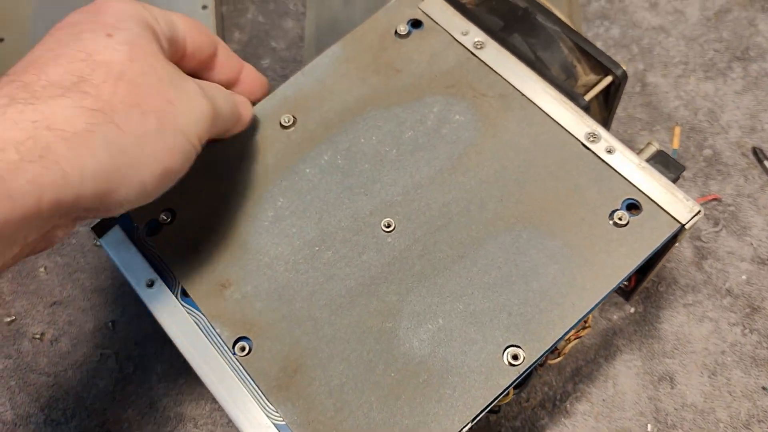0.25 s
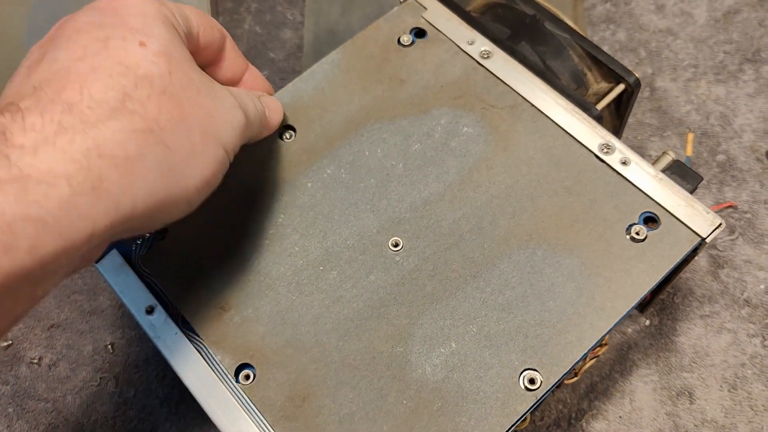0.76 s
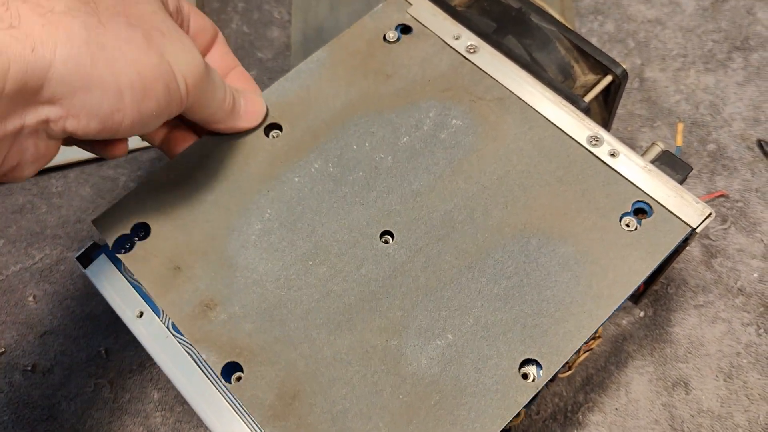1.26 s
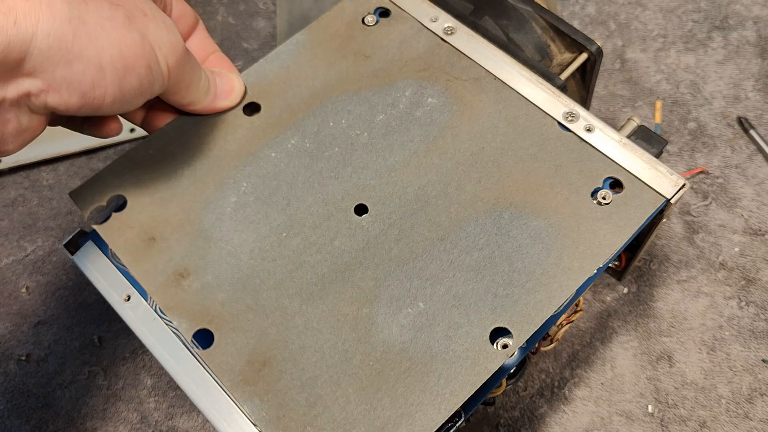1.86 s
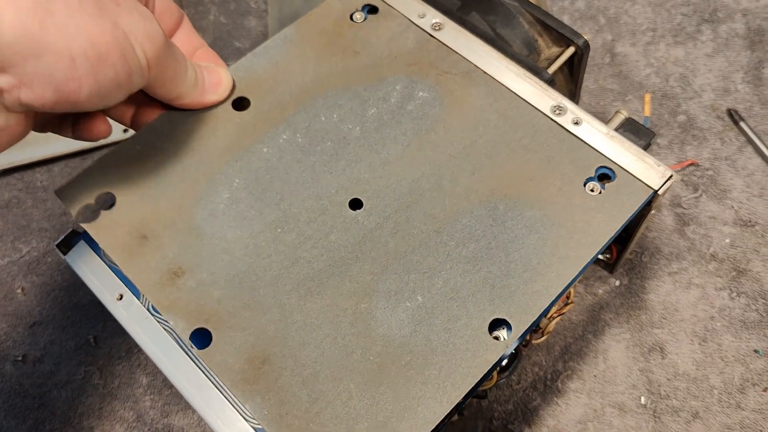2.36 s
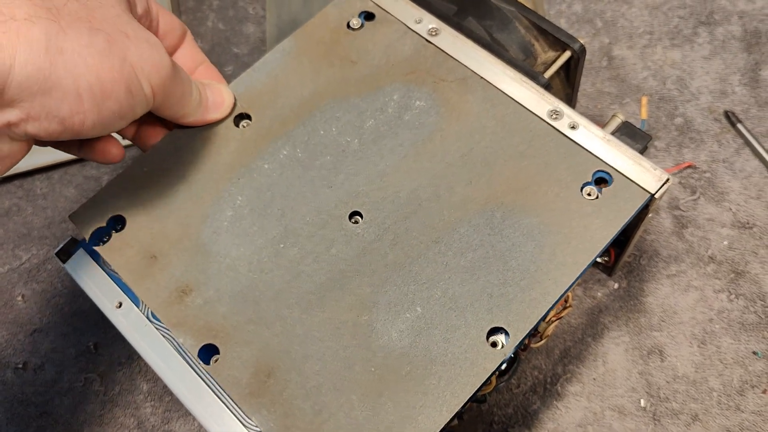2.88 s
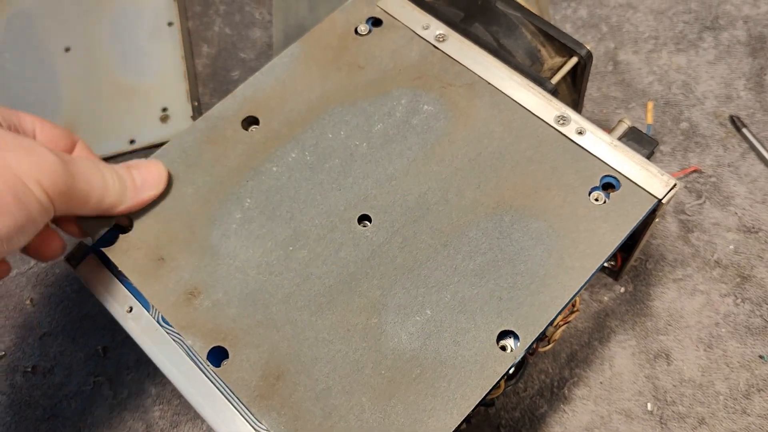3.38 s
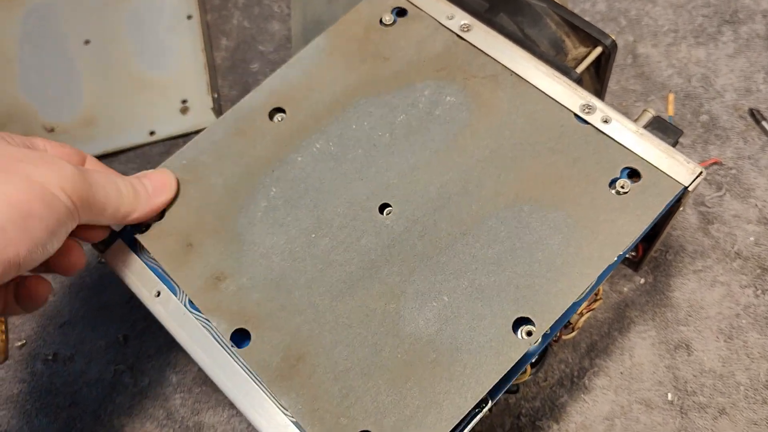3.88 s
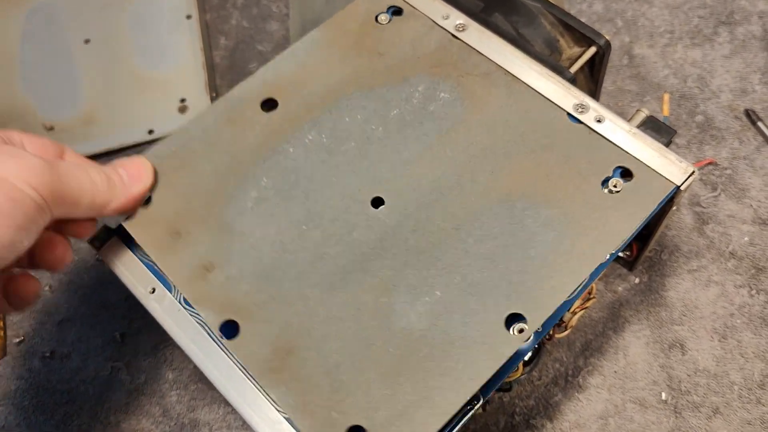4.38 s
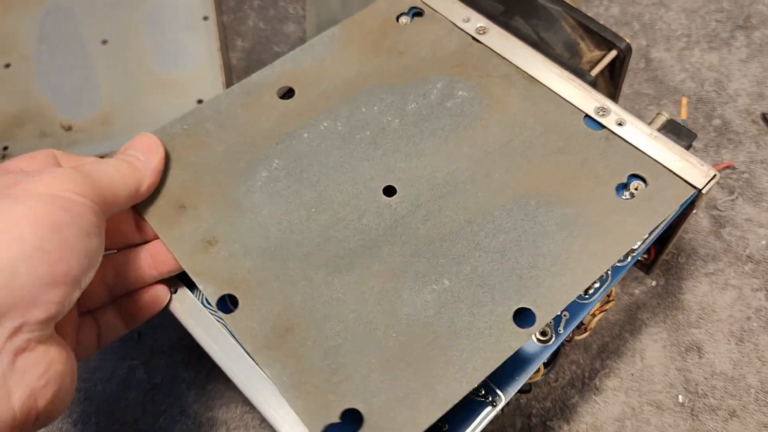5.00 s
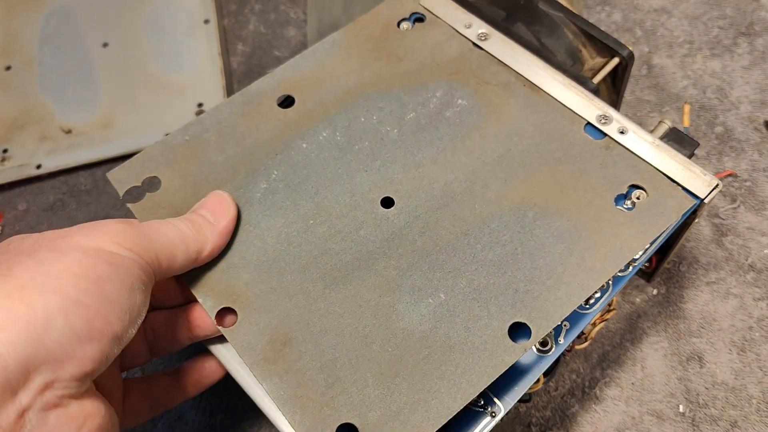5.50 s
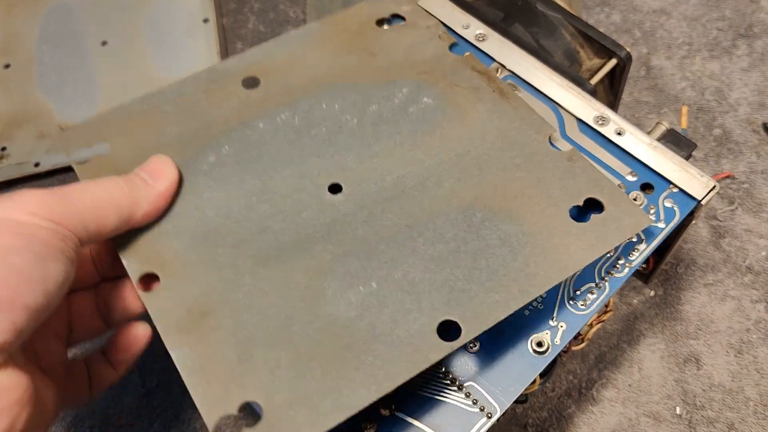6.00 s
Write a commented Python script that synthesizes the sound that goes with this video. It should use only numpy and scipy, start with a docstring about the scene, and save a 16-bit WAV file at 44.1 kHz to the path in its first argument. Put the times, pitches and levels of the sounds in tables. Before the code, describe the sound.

Heard close up in a quiet room, a thin steel panel flexes with a faint low wobble, and another plate slides aside with a short juddering scrape. Sharp clicks and light clanks follow at uneven intervals as the panel catches on the screws and frame of a chassis. Fingers stick and slip on the metal and small parts ping softly. Toward the end the panel scrapes and clatters more loudly, then ticks lightly.

```python
"""First comes a low, wobbling hum: a thin steel cover flexes as a hand works it loose from a chassis.
A second plate whispers over the carpeted bench, then groans briefly as it is shoved aside.
Fingers stick and slip on the cover, it clicks and rattles on screw heads, and small parts ping.
A quiet room lies under it all, and everything is heard close up, in stereo."""
import sys
import numpy as np
from scipy import signal
from scipy.fft import rfft, irfft
from scipy.io import wavfile
from scipy.ndimage import uniform_filter1d

SR = 44100
rng = np.random.default_rng(int(sys.argv[2]) if len(sys.argv) > 2 else 0)


def materialize(psi):
    """Save the field psi as 16-bit PCM at rate SR to the path in sys.argv[1].

    A 1-D psi becomes a single channel; in a 2-D psi each row is a channel.
    """
    bounded = np.clip(np.atleast_2d(psi).T, -1, 1)
    quanta = np.round(bounded * 32767).astype(np.int16)
    wavfile.write(sys.argv[1], SR, quanta)


N = 275625  # 6.25 seconds


def gain_of(db):
    return 10 ** (np.asarray(db) / 20)


def unit_level(x):
    return x / np.sqrt(np.mean(x ** 2) + 1e-20)


def curve_at(points, hz):
    freqs, values = np.transpose(points)
    return np.interp(np.log(hz + 1), np.log(freqs + 1), values)


def add_at(mix, start_s, sound):
    part = mix[:, round(start_s * SR):][:, :sound.shape[1]]
    part += sound[:, :part.shape[1]]


def filtered(x, gain):
    """Turns each frequency up or down by gain(hz)."""
    return irfft(rfft(x) * gain(np.fft.rfftfreq(x.shape[-1], 1 / SR)), x.shape[-1])


def above(edge_hz, hz, steepness):
    """Near 0 below the edge and near 1 above it."""
    return 1 / (1 + (edge_hz / (hz + 1)) ** steepness)


def wander(shape, smooth):
    """A random wiggle, smoothed over that many points."""
    return unit_level(uniform_filter1d(rng.standard_normal(shape), smooth))


def peaks(modes, hz):
    """Gain with a peak at each mode, a note that the steel likes to ring at."""
    return np.sqrt(sum(gain_of(2 * db) / (1 + (2 * (hz - f) / width) ** 2) ** 2
                       for f, width, db in modes))


def swells(full_s, rise, hold, fall, db, tiring_db_per_s=9.5):
    """Loudness of moves that climb 20 dB during rise, weaken during hold and drop 20 dB during fall."""
    t = np.arange(0, N, 32)[:, None] / SR
    rise, hold, fall = (np.maximum(x, .001) for x in (rise, hold, fall))
    fade_db = 20 * np.maximum(np.maximum((full_s - t) / rise, (t - full_s - hold) / fall), 0)
    tired_db = tiring_db_per_s * np.clip(t - full_s, 0, hold)
    return np.interp(np.arange(N) / SR, t[:, 0], gain_of(db - fade_db - tired_db).sum(1))


# Each row: frequency in Hz, how alike left and right are (1 means the same).
LIKENESS = [(60, 0.99), (500, 0.85), (1500, 0.3), (15000, 0.75)]
def stereo_noise(size):
    """Left and right noise, partly alike, as from a nearby source."""
    left, other = rng.standard_normal((2, size))
    same = lambda hz: np.clip(curve_at(LIKENESS, hz), 0, 1)
    right = filtered(left, same) + filtered(other, lambda hz: np.sqrt(1 - same(hz) ** 2))
    return np.array([left, right])


# Jolts of the hand. Each row: time of full strength and hold in seconds, hum and wobble in dB.
JOLTS = [(0., .01, -53, -46.5), (0.115, 0.16, -79, -59.5), (0.775, .01, -71, -83), (0.917, 0.013, -68, -78),
         (1.076, 0.11, -55, -53), (1.478, 0.093, -65, -78), (1.73, .1, -76, -71),
         (1.951, 0.021, -54, -68.5), (2.097, 0.19, -79, -68), (2.327, 0.045, -53.5, -81),
         (2.596, 0.23, -74, -82), (2.945, 0.13, -66.5, -60.5), (3.103, 0.1, -62, -62),
         (3.373, 0.036, -65, -77), (3.62, .06, -59, -80), (3.753, 0.091, -63, -55),
         (4.022, 0.042, -60, -59), (4.15, 0.04, -61.5, -58), (4.347, 0.053, -51.5, -78.5),
         (4.583, 0.028, -53, -57.5), (4.747, 0.065, -70, -67.5), (5.055, 0.12, -73, -69.5),
         (5.303, .03, -66, -73.5), (5.462, 0.034, -57.5, -58.5), (5.627, 0.047, -54.5, -60),
         (5.786, .04, -47, -50), (5.86, .01, -62.5, -55.5), (6.047, 0.023, -56, -74),
         (6.19, 0.013, -50, -67)]
def cover_flexing():
    """Each jolt shakes the two lowest modes of the loose cover: a hum and a deeper wobble."""
    full_s, hold, hum_db, wobble_db = np.transpose(JOLTS)
    shake, t = stereo_noise(N), np.arange(N) / SR

    def mode(pitch_hz, width_hz):
        rumble = filtered(shake, lambda hz: (hz > 28) / (1 + ((hz - pitch_hz) / width_hz) ** 2))
        note = np.sin(2 * np.pi * (pitch_hz * t + rng.random()))
        return unit_level(unit_level(rumble) + 0.96 * note)

    hum = mode(114, 16.5) * swells(full_s, rise=0.07, hold=hold, fall=0.09, db=hum_db)
    wobble = mode(31, 24) * swells(full_s, rise=0.07, hold=hold, fall=0.091, db=wobble_db)
    return hum + wobble


# Tone of steel on carpet. Each row: frequency in Hz, level in dB.
CARPET_TONE = [(590, -13), (1000, -7), (1110, -29), (1400, -44), (1550, -20), (2140, 0.5), (2480, -6),
               (3420, -6), (3710, 0.5), (4060, -7), (6820, -15), (10700, -28.5), (15600, -28)]
# Slides of the plate. Each row: time of full strength, rise, hold and fall in seconds, level in dB.
PLATE_SLIDES = [(0., .01, .003, 0.23, -61), (0.431, 0.0031, 0.029, 0.044, -69.5),
                (0.54, 0.09, 0.032, 0.062, -69.5), (0.64, 0.056, .004, .08, -57),
                (0.754, 0.085, .004, .005, -58.5)]
def plate_whisper():
    """The second plate drags over the carpet with a soft hiss, a little to the left."""
    hiss = unit_level(filtered(stereo_noise(N), lambda hz: gain_of(curve_at(CARPET_TONE, hz))))
    return hiss * swells(*np.transpose(PLATE_SLIDES)) * gain_of([[2.1], [-2.1]])


# The cover's modes, rung by rubs and by hits. Each row: pitch in Hz, width in Hz, level in dB.
LOW_MODES = [(162, 24, -11), (183.5, 12, -10), (241.2, 18, 2), (289, 39, -1), (331.2, 12.2, -4),
             (405, 32, -0.5)]
MIDDLE_MODES = [(504.7, 47, 0.5), (567, 40, -4.5), (652, 29.5, -4), (761, 44, -5), (901.6, 36, -7),
                (1027, 37, -7.5), (1168, 29, -7), (1160, 30, -8), (1244, 45, 2), (1437, 40, 2.5),
                (1534, 210, -0.5)]
UPPER_MODES = [(2060, 22, 13), (2372, 69, 6), (2754, 38, 7), (3104, 140, 5), (3500, 310, -13.5),
               (3450, 22, -40), (3956, 200, -6), (4114, 13, 13.5), (4170, 40, 0.5), (5030, 70, -33),
               (5240, 22, -11), (6600, 78, 5.5), (6890, 31, 13)]
# Tone of a rub's hiss, body and high sheen. Each row: frequency in Hz, level in dB.
HISS_TONE = [(710, -50.5), (1200, -23), (1270, -13), (1800, -9.5), (2160, -3), (2550, -4.5), (2830, 1),
             (4040, 4.5), (4780, -3.5), (6510, -1.5), (8000, -10), (10400, -60.5), (17600, -120)]
BODY_TONE = [(100, -42.5), (170, 1.5), (231, -2), (446, -5), (515, 3), (817, -5.5), (883, -1.5), (1250, -9),
             (1700, -10.5), (2210, -25), (3740, -120)]
SHEEN_TONE = [(4120, -30), (7000, 0), (7770, -6), (8250, -5), (9720, -1), (12900, -13), (15600, -10)]
# Each row: time of full strength, rise, hold and fall in seconds, then hiss, body and sheen in dB.
RUBS = [(0., 0.011, 0.0038, .3, -79, -60, -95), (1.08, 0.011, .002, 0.042, -55, -48.5, -75),
        (1.122, .02, 0.047, 0.044, -65, -66, -76.5), (1.237, 0.011, .045, 0.015, -63, -71, -72.5),
        (1.398, 0.08, .003, .01, -70, -82, -82), (1.464, 0.062, .004, .035, -62, -69, -73.5),
        (1.824, .04, .002, 0.017, -74, -70, -90), (1.863, 0.0084, .002, 0.0087, -81, -69, -90),
        (1.931, 0.042, 0.013, 0.015, -47.5, -51, -60), (1.955, .01, 0.043, 0.024, -74, -67, -86),
        (2.172, 0.059, .002, 0.017, -71.5, -68.5, -90), (2.256, 0.041, .004, 0.035, -55.5, -58, -71),
        (2.314, 0.022, .002, 0.0079, -49.5, -51, -62), (2.341, 0.034, 0.0034, 0.089, -59, -58, -82),
        (2.549, 0.021, .003, .09, -67, -65.5, -80), (2.83, 0.068, 0.0037, 0.012, -64, -68.5, -76.5),
        (2.962, 0.07, 0.0033, .01, -60, -60, -76), (3.031, 0.032, .002, .03, -58, -59, -73),
        (3.115, 0.0051, .002, 0.03, -73, -56, -78), (3.147, 0.027, 0.48, .018, -50, -63, -59.5),
        (3.673, .01, .002, 0.037, -61, -54.5, -79), (3.741, 0.025, 0.0027, 0.029, -58, -60, -65),
        (3.796, 0.03, 0.0046, 0.048, -60.5, -58, -75), (3.98, 0.059, 0.02, 0.012, -62, -66, -75),
        (4.128, 0.043, .004, 0.012, -49.5, -53, -61), (4.156, 0.015, 0.024, 0.016, -56.5, -54.5, -77),
        (4.285, 0.058, 0.013, 0.011, -58, -59.5, -72), (4.355, 0.024, 0.016, 0.14, -60.5, -56, -77),
        (4.56, 0.028, 0.0018, 0.0087, -48, -52, -66), (4.59, .01, 0.017, 0.069, -55.5, -53, -73),
        (4.709, 0.035, 0.046, 0.056, -52, -60, -64.5), (4.835, 0.037, 0.024, 0.016, -73, -72, -88.5),
        (5.104, .08, 0.022, 0.1, -55.5, -57.5, -65), (5.19, 0.011, 0.0026, 0.03, -92, -55, -100),
        (5.34, 0.099, 0.047, 0.079, -54, -68.5, -55), (5.429, 0.034, .005, 0.081, -53, -61.5, -65.5),
        (5.503, 0.025, .004, 0.045, -70, -66, -78), (5.536, 0.036, 0.0044, 0.16, -66, -56.5, -75.5),
        (5.682, 0.025, 0.034, .02, -75, -64, -86), (5.744, 0.01, 0.034, 0.0087, -41.5, -46, -53.5),
        (5.787, 0.022, 0.0031, 0.021, -29.5, -35, -46), (5.839, .01, 0.0015, 0.01, -51, -40.5, -74),
        (5.852, .01, .003, 0.14, -64, -60, -78), (6.04, 0.017, .002, 0.04, -58.5, -49, -66.5),
        (6.093, 0.029, .04, 0.009, -75, -76, -82), (6.15, 0.012, .002, 0.048, -50, -51, -62.5),
        (6.24, 0.014, .01, .01, -69, -69, -79)]
def cover_rubbing():
    """Fingers and edges stick and slip on the cover, and the tiny grains of noise ring the steel."""
    roughness = gain_of(1.63 * wander(N, smooth=60))
    grains = stereo_noise(N) * roughness
    top = lambda hz: above(7300, hz, steepness=12)
    band = lambda tone, shape: filtered(grains, lambda hz: gain_of(curve_at(tone, hz)) * shape(hz))
    hiss = band(HISS_TONE, lambda hz: (1 - top(hz)) * (1 + 0.37 * peaks(UPPER_MODES, hz)))
    body = band(BODY_TONE, lambda hz: 1 + 2.5 * peaks(LOW_MODES + MIDDLE_MODES, hz))
    sheen = band(SHEEN_TONE, top)
    *timing, hiss_db, body_db, sheen_db = np.transpose(RUBS)
    layers = (hiss, hiss_db), (body, body_db), (sheen, sheen_db)
    return sum(unit_level(sound) * swells(*timing, db) for sound, db in layers)


# Tone of the quiet room. Each row: frequency in Hz, level in dB.
AIR_TONE = [(20, -51), (31, 4.5), (107, -4), (188, -6.5), (390, 2), (446, -6), (948, -17), (1460, -21),
            (1620, -22.5), (3270, -23.5), (3950, -22.5), (4770, -35), (6770, -25), (7960, -36),
            (15600, -28.5)]
def room_air(level_db=-69.5):
    """The room's faint, steady background noise."""
    noise = filtered(stereo_noise(N), lambda hz: gain_of(curve_at(AIR_TONE, hz)))
    return gain_of(level_db) * unit_level(noise)


# Each row: frequency in Hz, seconds for the echo to fade by 60 dB.
ECHO_FADES = [(200, 0.25), (1000, 0.29), (4000, 0.12), (12000, 0.21)]
def room_echo(sound):
    """Many small reflections blur together, each frequency dying at its own speed."""
    echoes = np.zeros((2, SR // 2))
    delays = np.arange(300, SR // 2 - 20, 20) + rng.integers(0, 20, (2, (SR // 2 - 301) // 20))
    np.put_along_axis(echoes, delays, rng.choice([-1., 1.], delays.shape), 1)
    hz, t, spectrum = signal.stft(echoes, SR, nperseg=256)
    fade = gain_of(-60 * t / curve_at(ECHO_FADES, hz)[:, None])
    tail = signal.istft(spectrum * fade, SR, nperseg=256)[1]
    return signal.fftconvolve(sound, tail / np.linalg.norm(tail[0]), axes=1)[:, :N]


# The second plate's modes. Each row: pitch in Hz, width in Hz, level in dB.
PLATE_MODES = [(340.2, 20, 1.5), (404.4, 27, -0.5), (492, 62, -1), (572, 25, -7), (660, 46, -0.5),
               (792, 52, -4), (890, 40, -28.5), (1255, 40, -22)]
# Tone of the plate's grit and the cover's clicks. Each row: frequency in Hz, level in dB.
STEEL_TONE = [(880, -7), (1500, -4), (1800, -4.5), (2090, -2.5), (2530, -3.5), (2690, 1), (4410, 0),
              (5130, -9), (6670, -6), (7690, -15.5), (9120, -11), (13400, -27.5), (15300, -18),
              (16700, -23)]
# Jerks of the plate. Each row: time of full strength, rise, hold and fall in seconds,
# groan in dB, favoured pitch in Hz, grit in dB.
PLATE_JERKS = [(0.654, 0.052, .003, 0.017, -56, 567, -59), (0.69, 0.057, .003, 0.076, -61.5, 413, -64),
               (0.771, 0.0064, 0.0056, 0.031, -33.5, 405, -38), (0.815, .005, 0.0059, .04, -48.5, 495, -55),
               (0.844, .005, 0.011, 0.023, -47, 355, -51), (0.86, .008, 0.0067, 0.02, -44, 520, -51.5),
               (0.881, 0.018, 0.0069, 0.027, -37.5, 455, -43),
               (0.912, 0.0037, 0.017, 0.023, -40.5, 329, -50)]
def plate_groan():
    """The shoved plate judders with a gritty scrape, and each jerk favours different modes."""
    *timing, groan_db, favoured_hz, grit_db = np.transpose(PLATE_JERKS)
    mode_hz, _, mode_db = np.transpose(PLATE_MODES)[:, :, None]
    closeness = lambda ratio: gain_of(-90 * np.log2(ratio) ** 2)
    ratios = mode_hz / favoured_hz
    weights = gain_of(mode_db) * (closeness(ratios) + 0.5 * closeness(ratios / 1.8))
    shares_db = 20 * np.log10(weights / np.linalg.norm(weights, axis=0))
    shake, t = stereo_noise(N), np.arange(N) / SR
    groan = np.zeros((2, N))
    for share_db, mode in zip(shares_db, PLATE_MODES):
        note = np.sin(2 * np.pi * (mode[0] * t + rng.random()))
        rasp = unit_level(filtered(shake, lambda hz: peaks([mode], hz)))
        groan += swells(*timing, groan_db + share_db) * unit_level(note + 0.64 * rasp)
    judder = gain_of(3.3 * wander(N, smooth=150))
    scrape = filtered(shake, lambda hz: gain_of(curve_at(STEEL_TONE, hz) - 8 * above(7000, hz, 6)))
    grit = unit_level(scrape * judder) * swells(*timing, grit_db)
    return groan * gain_of([[-1.1], [1.1]]) + grit * gain_of([[2.1], [-2.1]])


HIT_SAMPLES, CLICK_LEAD_S = 8192, .012  # the lead gives a click time to rise before its peak
def click(treble_db, bright_hz, rise_s, rattle_s):
    """A sharp tick, then tiny uneven bounces, ringing the cover's upper modes."""
    t = np.arange(HIT_SAMPLES) / SR - CLICK_LEAD_S
    bounces = gain_of(3.5 * wander(HIT_SAMPLES, smooth=60) * np.clip(t / .004, 0, 1))
    attack = np.exp(np.minimum(t, 0) / max(rise_s, .0002))
    fade = lambda seconds: gain_of(-60 * abs(t) / seconds)
    decay = fade(max(rattle_s, .005)) + 0.4 * fade(0.0035) + 0.014 * fade(0.23)  # rattle, tick, tail
    luck_db = 2.5 * wander(HIT_SAMPLES // 2 + 1, smooth=40)  # pitches that this hit favours

    def tone(hz):
        bright_db = 8 * np.exp(-(np.log((hz + 1) / bright_hz) / 0.21) ** 2)
        top_db = (treble_db + 13.5) * above(7000, hz, 6)
        db = curve_at(STEEL_TONE, hz) + luck_db + bright_db + top_db
        return gain_of(db) * above(1100, hz, 4) * (1 + 0.63 * peaks(UPPER_MODES, hz))

    sound = filtered(stereo_noise(HIT_SAMPLES), tone) * attack * decay * bounces
    return sound / np.sqrt(uniform_filter1d(sound ** 2, 88, axis=1).max())  # loudest 2 ms at level 1


def cover_ring(modes, centre_hz):
    """Struck modes die away; the spot that is hit favours those near one pitch, with some luck."""
    hz, width, db = np.transpose(modes)[:, :, None]
    t = np.arange(HIT_SAMPLES) / SR
    luck, phase = rng.standard_normal((2, len(modes), 1))
    db = db + 2 * luck - 4.6 * np.log2(hz / centre_hz) ** 2
    ring = (gain_of(db) * np.exp(-np.pi * width * t) * np.sin(2 * np.pi * hz * t + phase)).sum(0)
    ring *= 1 - np.exp(-t / 0.0014)  # the bass takes a moment to build
    return ring / abs(ring).max() * np.ones((2, 1))


# Each row: time in seconds, click level in dB, thud and clank in dB above the click, clank pitch in Hz,
# treble in dB (-13.5 is neutral), bright spot in Hz, rise in seconds, seconds for the rattle to fade
# by 60 dB, and how many dB louder the click is on the left.
COVER_HITS = [(0.811, -42.5, -16, 7, 510, -46, 2530, 0.0018, 0.081, -3.5),
              (1.0163, -24.5, -19, -10.5, 496, -15, 3300, 0.00058, 0.018, -0.5),
              (1.033, -34.5, -27, -5, 495, -28, 3140, 0.0013, 0.051, 0),
              (1.0852, -41, -6, -17, 522, -12, 3440, 0.001, 0.033, 0),
              (1.1113, -35, -30, -12.5, 554, -21, 4000, 0.0012, 0.03, 1.5),
              (1.4109, -45, -22, -4.5, 695, -36, 2110, 0.0013, 0.028, 8.5),
              (1.51, -64.5, -13, 7.5, 680, -36, 3870, 0.0012, 0.025, 4),
              (1.9251, -51.5, -16, 16.5, 505, -15, 4430, 0.001, 0.035, -4),
              (1.9395, -37.5, -23, -3, 474, -2, 3330, 0.00052, 0.014, 6),
              (2.0208, -39.5, -20.5, -11, 530, -6.5, 3750, 0.0014, 0.038, 4.5),
              (2.274, -58.5, -2, 7.5, 1240, -8, 2800, 0.001, 0.064, 10),
              (2.319, -25.5, -14.5, -8, 510, -7.5, 3800, 0.00082, 0.048, 0.5),
              (2.5544, -64.5, -17.5, 14.5, 519, -5, 4370, 0.001, 0.087, 1),
              (2.613, -64.5, -19, 2.5, 1350, -20, 4250, 0.001, 0.062, 3),
              (2.9693, -38.5, -13.5, -12, 1270, -16, 4070, 0.00089, 0.022, 1.5),
              (3.029, -51.5, -3.5, -11, 533, -10, 3320, 0.00079, 0.045, 5),
              (3.0823, -27.5, -10, -10.5, 510, -10, 4200, 0.00086, 0.012, 0.5),
              (3.612, -46, -14, -5.5, 605, -32, 2880, 0.00088, 0.012, -5),
              (3.656, -40.5, -11.5, -9, 627, -13, 2690, 0.0065, 0.063, -1),
              (3.745, -44.5, -23, -10, 576, -35, 2520, 0.001, 0.033, -5),
              (3.7669, -52, -3, -4, 568, -8, 2960, 0.0008, 0.12, 3),
              (3.975, -49.5, -25, -8, 1100, -17, 4320, 0.002, 0.03, 0),
              (4.0041, -30, -18.5, -8, 596, -37, 2320, 0.0014, 0.024, -4),
              (4.1166, -47.5, -16, 2, 1200, -23, 4180, 0.001, 0.045, 0),
              (4.1353, -39.5, -29, 5.5, 1030, -35, 2720, 0.0013, 0.037, 2),
              (4.1522, -40.5, -7.5, 1, 1170, -7, 2920, 0.001, 0.038, -1),
              (4.3067, -20.5, -18, -5, 473, -9.5, 4600, 0.0012, 0.055, 2.5),
              (4.3168, -24.5, -10.5, -3.5, 486, -40, 4670, 0.00082, 0.024, 9.5),
              (4.5368, -41, -20, -2, 490, -4, 4300, 0.0011, 0.05, 1),
              (4.563, -26, -21, -5, 650, -5, 4740, 0.00072, 0.053, 4),
              (4.9648, -61, -38, -15, 1110, -18.5, 3930, 0.0016, 0.04, -1),
              (4.9838, -47, -27, 3, 1370, -15, 2240, 0.00044, 0.064, 2),
              (4.9922, -39.5, -22, -3, 1180, -38, 1850, 0.00058, 0.043, 8.5),
              (5.1735, -45.5, 3, 2.5, 1210, -21, 2370, 0.0015, 0.042, -1),
              (5.2409, -51, -23, -3, 870, -8, 4840, 0.0015, 0.042, 0),
              (5.267, -49.5, -25, -7, 522, -11, 4400, 0.0011, 0.15, 0),
              (5.4327, -50, -28, 5, 1180, -14, 3940, 0.003, 0.073, -9),
              (5.5096, -44, -12, -12, 511, -13, 4000, 0.0015, 0.023, -2),
              (5.5381, -58.5, -3, 13.5, 514, -19, 2400, 0.0009, 0.18, 5),
              (5.661, -42.5, -14, 6, 676, -11.5, 3800, 0.0026, 0.064, -0.5),
              (5.742, -43, -3, 8.5, 1270, -9, 3200, 0.0019, 0.14, 7),
              (5.755, -31, -34, 4.5, 1480, -7, 3930, 0.00079, 0.012, -3),
              (5.7877, -25.5, -9, 5.5, 592, -16, 3730, 0.0012, 0.034, 9),
              (5.798, -35, -14, 6.5, 685, -44, 3800, 0.001, 0.048, -2),
              (5.808, -38, -22, -23, 479, -33, 3540, 0.001, 0.028, 8),
              (5.8353, -35.5, -13.5, 2.5, 1120, -16, 2970, 0.0014, 0.014, -3),
              (6.0188, -57, -15, 9.5, 706, -11.5, 3950, 0.0011, 0.073, -1),
              (6.033, -56.5, -25, -13, 534, -37, 4600, 0.00088, 0.11, 11),
              (6.1536, -42, -12, -1.5, 610, -19, 3900, 0.0016, 0.038, -3.5)]
def cover_hits():
    """The cover strikes screws and frame, each time with a click, a clank and a low thud."""
    mix = np.zeros((2, N))
    for s, db, thud_db, clank_db, clank_hz, treble_db, bright_hz, rise, rattle, left_db in COVER_HITS:
        pan = gain_of([[left_db / 2], [-left_db / 2]])
        add_at(mix, s - CLICK_LEAD_S, gain_of(db) * click(treble_db, bright_hz, rise, rattle) * pan)
        clank = gain_of(db + clank_db) * cover_ring(MIDDLE_MODES, clank_hz)
        thud = gain_of(db + thud_db) * cover_ring(LOW_MODES, centre_hz=342)
        add_at(mix, s, clank + thud)
    return mix


# Each row: start in seconds, level in dB, pitch in Hz, seconds to fade by 60 dB.
CHASSIS_PINGS = [(1.41, -48, 795, 0.087), (1.51, -43.5, 1420, 0.031), (1.51, -53, 680, 0.057),
                 (1.6, -50.5, 1400, 0.034), (1.6, -58, 1010, 0.047), (1.815, -65.5, 5150, 0.087),
                 (2.13, -77, 5200, 0.13), (3.138, -51, 1344, 0.14), (4.265, -56.5, 1234, 0.077),
                 (5.076, -60, 1250, 0.33), (5.44, -54, 1430, 0.18), (5.541, -61, 1150, 0.088),
                 (5.666, -50.5, 1390, 0.2), (5.85, -59.5, 3600, 0.34)]
def chassis_pings():
    """Small parts of the chassis ring on, each with one wavering, dying note."""
    mix, t = np.zeros((2, N)), np.arange(HIT_SAMPLES) / SR
    for start_s, db, hz, fade_s in CHASSIS_PINGS:
        waver = 1 + 0.86 * wander((2, HIT_SAMPLES), smooth=300)
        loudness = gain_of(db - 60 * t / fade_s) * (1 - np.exp(-t / 0.0054))
        add_at(mix, start_s, loudness * np.sin(2 * np.pi * hz * t) * waver)
    return mix


def scene():
    """Mixes the handling sounds and their echo with the low flexing and the room's air."""
    trim_top = lambda hz: 1 / (1 + (hz / 15750) ** 300)  # rubs and air reach less high than hits
    handling = cover_hits() + chassis_pings() + plate_groan() + plate_whisper()
    handling += filtered(cover_rubbing(), trim_top)
    echo = gain_of(-14.5) * room_echo(handling)
    return handling + echo + cover_flexing() + filtered(room_air(), trim_top)


# Each row: frequency in Hz, how many dB louder the left channel is than the right.
LEFT_LOUDER = [(60, 0.5), (110, 0.5), (200, 1.5), (380, 1.5), (700, 3.0), (1290, 2.5), (2380, -3.0),
               (4400, -8.0), (8120, -8), (15000, -8)]
# Each row: frequency in Hz, phase lead (head start) of the left channel over the right in radians.
LEFT_PHASE_LEAD = [(0, 0), (860, 0.2), (1460, 1.9), (2070, 5.8), (2410, 7.5), (2760, 7.8), (3010, 9.7),
                   (4220, 11.2), (4480, 12.2), (5340, 11.7), (5770, 18.0), (6290, 18.6), (7410, 18.9),
                   (16500, 18.8)]
def record(dry, top_hz=16600):
    """The two channels differ in level and timing, and the highest treble is cut."""
    side = np.array([[1], [-1]])
    level = lambda hz: gain_of(side * curve_at(LEFT_LOUDER, hz) / 2)
    phase = lambda hz: np.exp(.5j * side * curve_at(LEFT_PHASE_LEAD, hz))
    heard = filtered(dry, lambda hz: level(hz) * phase(hz))
    treble_cut = signal.firwin(511, top_hz, window=("kaiser", 9), fs=SR)
    return signal.oaconvolve(heard, treble_cut[None], "same")


dry = scene()
out = record(dry)
materialize(out)
```